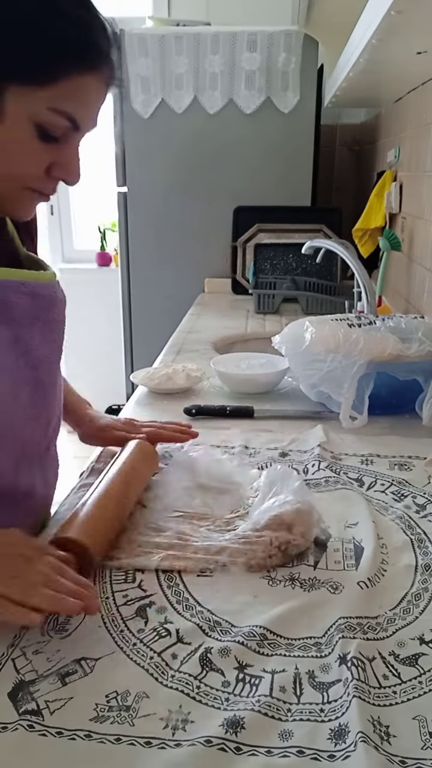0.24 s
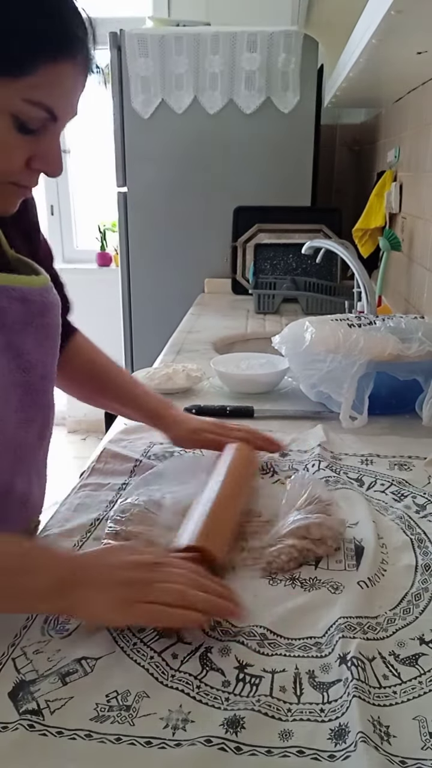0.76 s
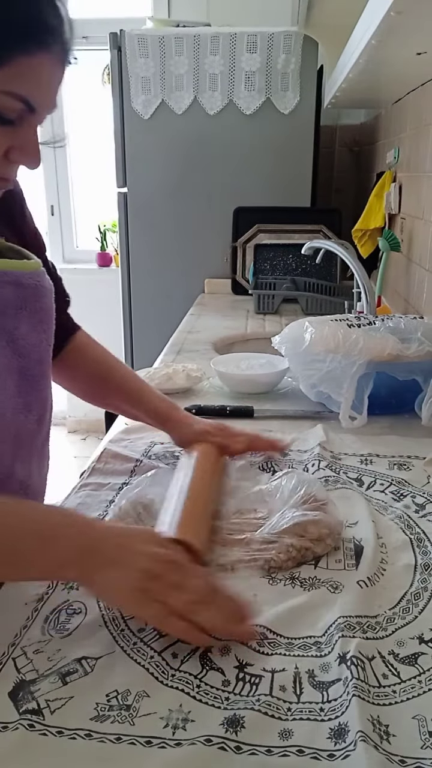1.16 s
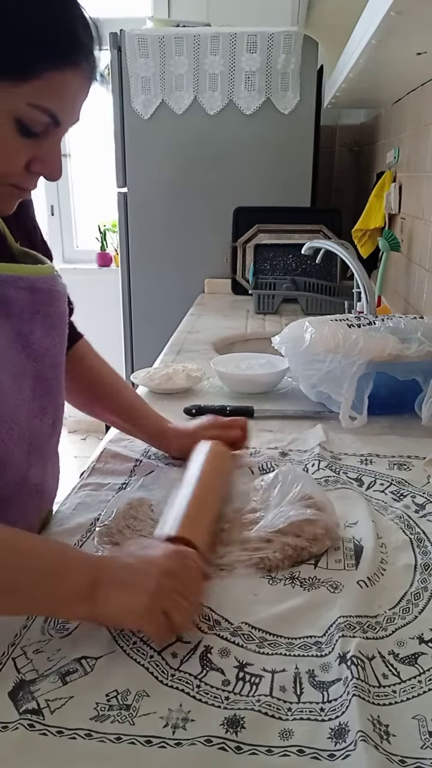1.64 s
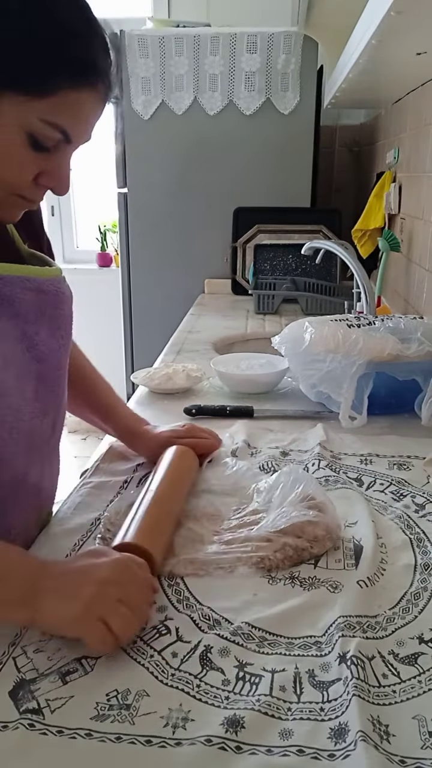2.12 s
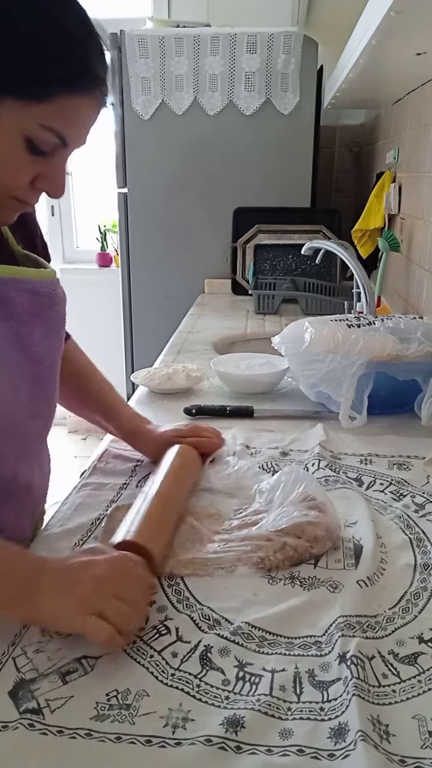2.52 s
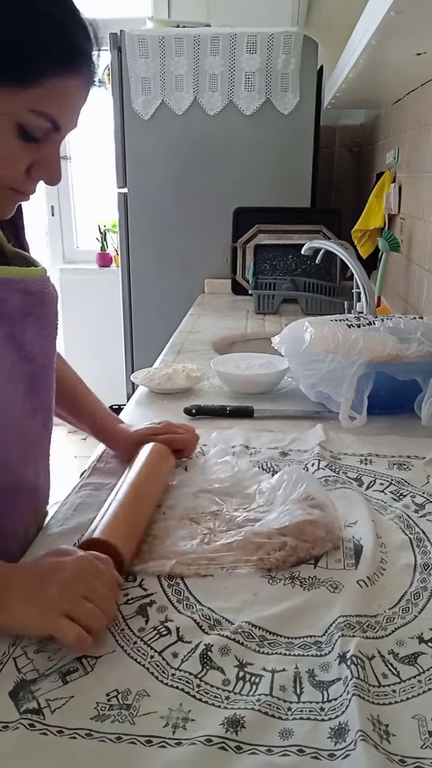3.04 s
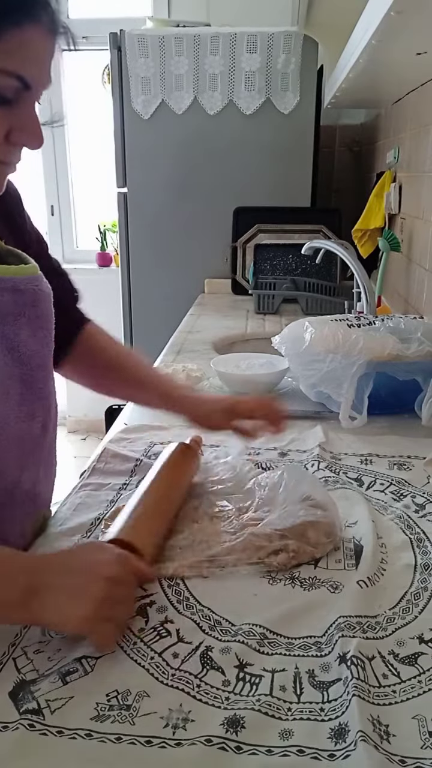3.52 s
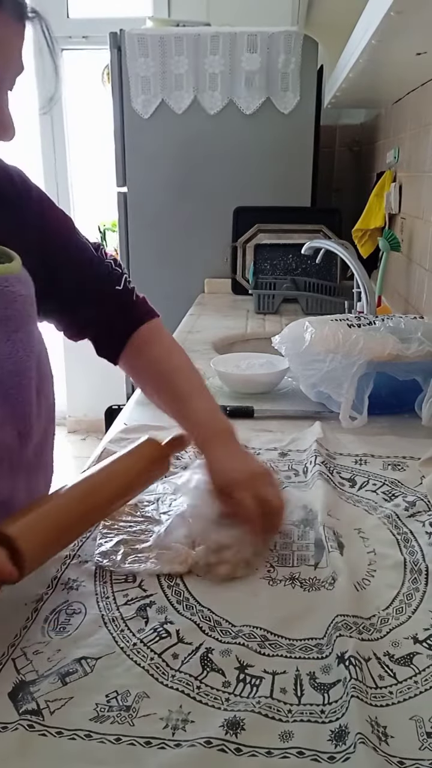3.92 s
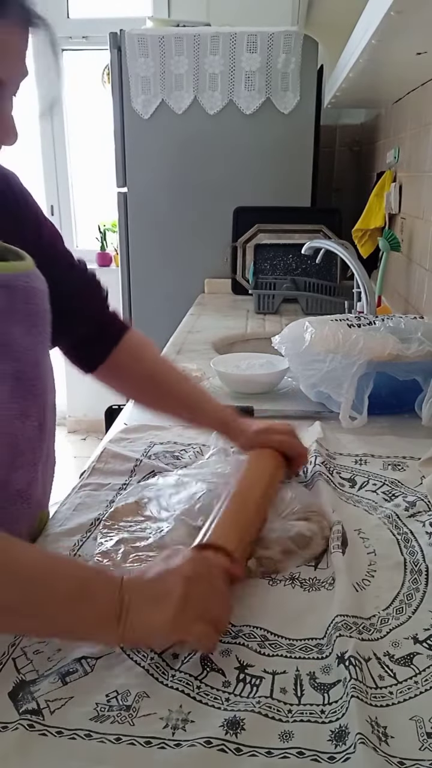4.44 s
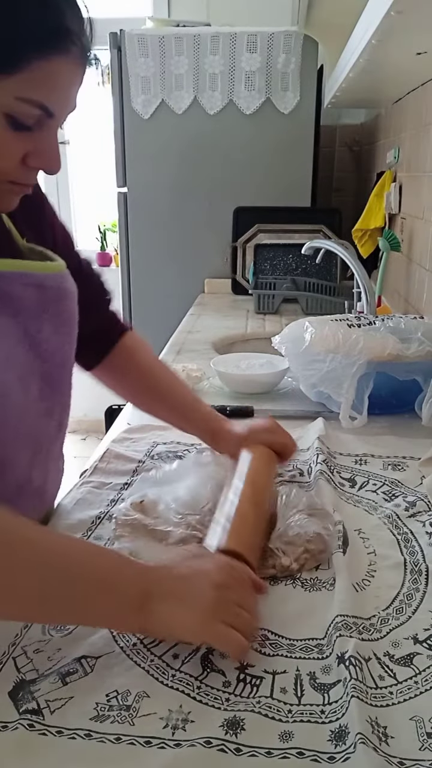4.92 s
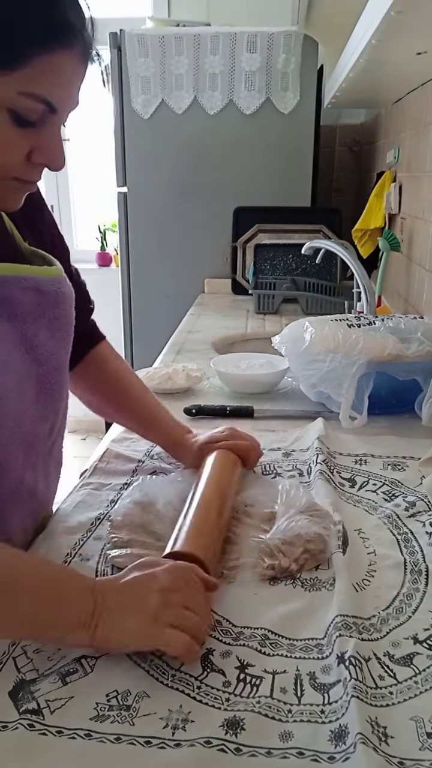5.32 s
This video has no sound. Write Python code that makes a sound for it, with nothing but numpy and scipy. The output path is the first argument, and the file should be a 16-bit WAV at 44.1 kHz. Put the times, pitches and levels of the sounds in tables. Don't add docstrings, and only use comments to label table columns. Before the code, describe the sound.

A wooden rolling pin crunches nuts in a crinkling plastic bag on a kitchen counter, with sharp cracks and dull thumps.

```python
import sys
import numpy as np
from scipy import signal
from scipy.fft import rfft, irfft
from scipy.io import wavfile

SR = 44100
rng = np.random.default_rng(int(sys.argv[2]) if len(sys.argv) > 2 else 0)


def file_out(sig):
    cols = np.atleast_2d(sig).T
    lim = np.clip(cols, -1, 1)
    pcm = np.round(lim * 32767).astype(np.int16)
    wavfile.write(sys.argv[1], SR, pcm)


def gain_from_decibels(decibels):
    exponent = np.asarray(decibels, float) / 20
    return 10 ** exponent


N = 245195
TIME = np.arange(N) / SR


def rms_one(x):
    return x / np.sqrt(np.mean(x ** 2) + 1e-20)


def peak_one(x):
    return x / np.abs(x).max()


def at_hz(points, hz):
    table = np.array(points)
    return np.interp(np.log(hz), np.log(table[:, 0]), table[:, 1])


def convolve(x, response):
    return signal.fftconvolve(x, response)[:len(x)]


def colour(points, size=4096):
    hz = np.maximum(np.fft.rfftfreq(size, 1 / SR), 10)
    level_db = np.maximum(at_hz(points, hz), -70)
    cepstrum = irfft(np.log(gain_from_decibels(level_db)))
    cepstrum[1:size // 2] *= 2
    cepstrum[size // 2 + 1:] = 0
    response = irfft(np.exp(rfft(cepstrum)))
    return response / np.sqrt(np.sum(response ** 2))


def band(x, low_hz, high_hz, order=2):
    edges = [low_hz, min(high_hz, .45 * SR)]
    return signal.sosfilt(signal.butter(order, edges, "band", fs=SR, output="sos"), x)


def drift(rate):
    step = 40
    r = np.exp(-2 * np.pi * rate * step / SR)
    chance = rng.standard_normal(N // step + 2002)
    slow = signal.lfilter([1], [1, -2 * r, r * r], chance)[2000:]
    return np.interp(np.arange(N) / step, np.arange(len(slow)), rms_one(slow))


def ring(x, hz, t60):
    r = gain_from_decibels(-60 / (t60 * SR))
    w = 2 * np.pi * hz / SR
    return signal.lfilter([0, np.sin(w)], [1, -2 * r * np.cos(w), r * r], x + 1e-18)


def grains(per_s, spread_db):
    sizes = gain_from_decibels(spread_db * np.minimum(rng.exponential(1, N), 5)) * rng.choice([-1, 1], N)
    return rms_one(sizes * (rng.random(N) < per_s / SR))


def add(track, s, sound):
    i = round(s * SR)
    track[i:i + len(sound)] += sound[:N - i]


def pressure(rows, film_db, body_db):
    s, db, rise, fall, weight_db = np.transpose(rows)[:, :, None]
    t = TIME[::50]
    away = np.maximum((s - t) / np.maximum(rise, .01), (t - s) / np.maximum(fall, .01))
    off_db = -20 * away ** 1.566
    load_db = db + 1.62 * off_db
    crumb_db = np.max(db + off_db, axis=0)
    pin_db = np.max(load_db + 0.58 * weight_db, axis=0) + body_db
    rumble_db = np.max(load_db + weight_db, axis=0)
    levels = [crumb_db + film_db, crumb_db, pin_db, rumble_db]
    return [np.interp(TIME, t, np.maximum(level, -120)) for level in levels]


# t/s of most pressure, crunch level/dB, rise/s, fall/s, weight on the counter/dB
STROKES = [(0.0, -55.5, 0.11, 0.25, -15), (0.114, -49, .1, 0.15, 1), (0.36, -49.5, .08, 0.31, 4.5),
           (0.444, -37.5, 0.032, 0.042, -6), (0.47, -49, .1, .17, -4), (0.70, -57.5, 0.36, 0.39, -13),
           (0.86, -52, .2, 0.1, -10.5), (0.98, -55, 0.13, 0.18, -8), (1.206, -52.5, .08, 0.12, 2),
           (1.39, -55.5, 0.068, .12, 4), (1.47, -54, 0.19, 0.2, -7), (1.70, -67.5, 0.22, 0.22, -2),
           (2.05, -56, 0.18, 0.099, 6), (2.21, -55, .08, 0.12, 0), (2.39, -55.5, 0.12, 0.19, 0.5),
           (2.594, -57, 0.12, 0.1, -1.5), (2.80, -52.5, .16, 0.13, 5), (2.97, -56.5, 0.11, 0.16, 0),
           (3.16, -54.5, 0.092, 0.17, -2), (3.384, -60, 0.18, 0.16, -8.5), (4.42, -42.5, 0.032, 0.048, -2),
           (4.46, -51.5, 0.068, 0.2, 1), (4.89, -55, .03, .13, -12), (5.07, -60, .09, .1, -6)]
# same columns
# t/s, crunch level/dB, rise/s, fall/s, weight/dB
GATHERS = [
    (3.68, -51, 0.028, 0.087, -3.5),
    (3.73, -49, 0.08, .24, -18.5),
    (3.942, -51, 0.18, 0.11, -23),
    (4.03, -55.5, .12, 0.083, -20),
    (4.12, -73.5, .1, 0.13, -13),
    (4.62, -61.5, .1, 0.07, -12),
    (4.70, -46, 0.045, 0.12, -12.5),
    (4.75, -47, 0.098, 0.099, -14),
]
# t/s, crunch level/dB, rise/s, fall/s, weight/dB
SETTLES = [
    (3.54, -67, .1, .12, -14),
    (4.3, -63, 0.055, 0.042, -10),
    (5.006, -48, 0.023, .07, -20),
    (5.07, -57, 0.088, 0.14, 9.5),
    (5.22, -54.5, 0.16, .05, -12),
    (5.31, -41, 0.033, 0.11, 2),
    (5.42, -54, .1, .07, 4.5),
    (5.52, -39.5, 0.016, 0.063, 1),
]


def pushes():
    return np.max([pressure(STROKES, film_db=-1.5, body_db=-9),
                   pressure(GATHERS, film_db=-0.95, body_db=3),
                   pressure(SETTLES, film_db=-14, body_db=-10.5)], axis=0)


# f/Hz, level per Hz/dB
CRUNCH_TONE = [(410, -61.5), (700, -12), (798, -6), (874, -11.5), (1740, -3.5), (1910, -3.5), (2450, 1.5),
               (2790, -3), (4700, -10.5), (6020, -2), (8900, -12.5), (10500, -25.5), (13900, -35),
               (15100, -17), (15800, -17)]


def crunch(film_db, crumb_db):
    clumps_per_s = 7000 * gain_from_decibels(2.5 * drift(25))
    snaps = convolve(grains(clumps_per_s, spread_db=2.0), colour(CRUNCH_TONE))
    film = signal.sosfilt(signal.butter(4, 4300, "high", fs=SR, output="sos"), snaps)
    crumbs = signal.sosfilt(signal.butter(4, 4300, "low", fs=SR, output="sos"), snaps)
    film = gain_from_decibels(film_db - 2.0 + drift(14)) * rms_one(film)
    return film + gain_from_decibels(crumb_db - 0.5 + drift(13.5)) * rms_one(crumbs)


# f/Hz, width/Hz, level/dB
PIN = [(280, 278, 1), (434, 406, 2.5), (627, 197, 0.5), (860, 110, -12.5)]


def wood(x):
    out = 0
    for k, (hz, width, db) in enumerate(PIN):
        sign = (-1) ** k
        out = out + sign * gain_from_decibels(db) * width * ring(x, hz, 2.03 / width)
    return out / SR * 6


# f/Hz, level/dB, time to fall 60 dB/s
COUNTER = [(87.7, -2, 0.15), (109.7, -1, 0.26), (145, 2, 0.17), (240.5, -5.5, 0.16), (295, -8, 0.2)]


def rolling(body_db, rumble_db):
    bumps = grains(120, spread_db=2.5) + 0.1 * rng.standard_normal(N)
    push = bumps * gain_from_decibels(rumble_db)
    rumble = sum(gain_from_decibels(db) * ring(push, hz, 0.5 * t60) for hz, db, t60 in COUNTER)
    body = rms_one(wood(grains(1500, spread_db=3.5)))
    rest = gain_from_decibels(-81)
    return gain_from_decibels(-29) * rumble + (gain_from_decibels(body_db - 7.5) + rest) * body


# t/s, peak level/dB, pin body level/dB, fullness/dB, brightness/dB
CRACKS = [(0.107, -33.5, -52, -12.5, -21), (0.4353, -38, -43, -6, -12), (0.4467, -31, -44, -10.5, -12),
          (0.46, -42, -46, -23, -22), (0.9504, -20.5, -34, -17.5, -14.5), (1.1986, -35, -51.5, -14, -17),
          (1.9104, -11.5, -47, -26, -15.5), (2.787, -41.5, -60, -20, -13), (2.795, -42, -53, -17, -15),
          (3.13, -49, -50, -26, -13), (3.678, -50.5, -54, -5, -2), (4.4114, -30, -54, -30, -20),
          (4.419, -24.5, -53.5, -17, -35), (5.011, -20.5, -44, -13, -21), (5.2764, -14, -25, -12.5, -15),
          (5.402, -31, -61, -25, -22), (5.5214, -17, -45, -15.5, -21.5)]
# t/s, peak level/dB, fullness/dB, brightness/dB
SNAPS = [(1.6128, -42, -13, -21), (1.63, -46.5, -26, -11.5), (1.806, -43.5, -21, -43),
         (3.4453, -38, -24, -25), (3.5001, -39, -24, -20), (3.517, -34, -26, -24), (3.537, -35.5, -32, -27),
         (4.253, -41, -22.5, -18), (4.2724, -35, -27, -17.5), (4.8642, -21, -21.5, -15.5),
         (5.152, -27, -19.5, -15), (5.219, -44, -26, -29)]


def cracks():
    out, shell = np.zeros(N), colour(CRUNCH_TONE)
    lead, length = .02, .007
    t = np.arange(4096) / SR - lead
    after = np.maximum(t, 0)
    shape = (1 - np.exp(-after / (0.23 * length))) * np.exp(-(after / length) ** 2)
    creak = gain_from_decibels(-28) * np.exp(-np.abs(t) / 0.0053)
    knock = peak_one(wood(np.exp(-((t - .004) / 0.00022) ** 2)))
    breaks = list(CRACKS) + [(s, db, db - 42, *tone) for s, db, *tone in SNAPS]
    chance = rng.standard_normal((len(breaks), len(t)))
    for (s, peak_db, body_db, low_db, bright_db), split in zip(breaks, chance):
        burst = convolve(split * (shape + creak), shell)
        low = peak_one(band(burst, 1120, 1750, order=4))
        middle = peak_one(band(burst, 1800, 4900, order=4))
        top = peak_one(band(burst, 5300, 8200) + gain_from_decibels(-9) * band(burst, 9000, 16000))
        start = s - lead - .002
        sound = gain_from_decibels(low_db + 8) * low + middle + gain_from_decibels(bright_db + 8) * top
        add(out, start, gain_from_decibels(peak_db - 1.0) * sound)
        add(out, start, gain_from_decibels(body_db + 7) * knock)
    return out


# t/s, f/Hz, peak level/dB, time to fall 60 dB/s
RINGS = [(0.444, 1680, -31, 0.033), (0.952, 2730, -26, 0.042), (.956, 456, -31, 0.084),
         (1.913, 1496, -37, 0.25), (1.911, 2170, -19.5, 0.062), (1.913, 2940, -28, 0.14),
         (3.447, 2720, -41.5, .07), (1.912, 2750, -20, 0.055), (1.911, 3860, -18.5, 0.028),
         (3.446, 2400, -37.5, .04), (3.504, 1865, -42.5, 0.24), (3.503, 2163, -34, 0.045),
         (3.505, 2500, -45, 0.15), (4.273, 3830, -41, 0.03), (4.272, 2740, -39, 0.033),
         (4.422, 2810, -22, 0.023), (4.864, 1200, -46, 0.36), (4.863, 2847, -29, 0.055),
         (5.012, 1240, -29.5, 0.14), (5.012, 2173, -25, 0.13), (5.011, 1885, -34.5, 0.13),
         (4.254, 1397, -50, 0.05), (5.276, 475, -22.5, 0.058), (5.278, 625, -28, 0.087),
         (5.279, 1659, -30, 0.19), (5.278, 1703, -30, 0.3), (5.279, 6370, -21.5, 0.022),
         (5.522, 1237, -36, 0.34), (5.523, 2122, -27, 0.13), (5.523, 4150, -17.5, 0.024)]


def rings():
    out, t = np.zeros(N), np.arange(SR // 4) / SR
    waver, wobble = drift(45), drift(30)
    starts = rng.integers(0, N - len(t), len(RINGS))
    for (s, hz, db, t60), i in zip(RINGS, starts):
        level = gain_from_decibels(db - 1.5 - 60 * t / t60 + 3.3 * waver[i:i + len(t)])
        swell = 1 - np.exp(-t / 0.00062)
        tone = np.sin(2 * np.pi * hz * t + 0.82 * wobble[i:i + len(t)])
        add(out, s - .001, level * swell * tone)
    return out


# t/s, peak level/dB, main f/Hz, upper modes level/dB
THUMPS = [(0.033, -45, 95, -17), (0.076, -41, 89.7, -13.5), (0.149, -49, 145, -15), (0.351, -40.5, 82, -11),
          (0.418, -37, 120, -13), (0.688, -54, 87, -33), (0.954, -38.5, 116, -7), (1.194, -69, 83.4, -11),
          (1.373, -52, 105, -8.5), (1.909, -28, 101, -37), (2.571, -51, 87, -14), (2.746, -46, 99, -16),
          (2.801, -53, 144, -13), (2.952, -50, 109, -25), (3.13, -46.5, 93, -6.5), (3.368, -65, 93, -34),
          (3.679, -47.5, 150, 0.5), (4.423, -48.5, 161, -25), (4.523, -56, 99.6, -16),
          (4.689, -49, 83.4, -8), (5.005, -30.5, 103, -32), (5.272, -25.5, 103, -23),
          (5.518, -28, 146, -17.5)]


def thumps():
    out, t = np.zeros(N), np.arange(SR // 2) / SR
    soft_start = 1 - np.exp(-t / 0.0054)
    chance = rng.standard_normal((len(THUMPS), len(COUNTER)))
    for (s, peak_db, main_hz, upper_db), luck in zip(THUMPS, chance):
        sound = 0
        for (hz, db, t60), spread in zip(COUNTER, luck):
            near_db = -12 * abs(np.log2(hz / main_hz)) if hz < 200 else upper_db + 6.5
            level = gain_from_decibels(db + near_db + 2 * spread - 60 * t / t60)
            sound = sound + level * np.sin(2 * np.pi * hz * t)
        add(out, s - .002, gain_from_decibels(peak_db + 2.5) * sound * soft_start)
    return out


# t/s, peak level/dB, f/Hz, length/s
SQUEAKS = [(0.384, -44.5, 5240, .012), (1.518, -53, 1833, 0.011), (1.559, -59, 1850, 0.035),
           (1.778, -72, 4210, .03), (2.372, -57, 5300, 0.0031), (2.421, -45, 5110, 0.0044),
           (2.597, -45, 3690, 0.0045), (2.623, -52, 3690, 0.0046), (2.65, -55, 3680, 0.0055),
           (2.756, -59, 3670, 0.0071), (3.106, -33.5, 5075, 0.0048), (3.129, -48.5, 5100, .015)]


def squeaks():
    out, t = np.zeros(N), np.arange(-SR // 10, SR // 10) / SR
    for s, db, hz, length in SQUEAKS:
        turn = 2 * np.pi * hz * t
        whistle = np.sin(turn) + gain_from_decibels(-30) * np.sin(2 * turn)
        add(out, s + t[0], gain_from_decibels(db) * np.exp(-(t / length) ** 2) * whistle)
    return out


# f/Hz, time to fall 60 dB/s
KITCHEN = [(100, 0.71), (400, 0.31), (1100, 0.45), (2900, 0.31), (7700, 0.3), (15000, 0.36)]


def kitchen():
    t, edges = np.arange(SR // 2) / SR, 60 * 2 ** np.arange(0, 8.6, .5)
    white = rng.standard_normal((2, len(t)))
    echoes = 0
    for k, (low, high) in enumerate(zip(edges, edges[1:])):
        t60 = at_hz(KITCHEN, np.sqrt(low * high))
        echoes = echoes + band(white[k % 2], low, high) * gain_from_decibels(-60 * t / t60)
    echoes = echoes * (1 - np.exp(-(t / .006) ** 2))
    return echoes / np.sqrt(np.sum(echoes ** 2))


# f/Hz, level per Hz/dB
HUSH_TONE = [(18, -52), (30, -50), (95, -18), (174, -41.5), (345, -25.5), (384, -14), (486, -39),
             (632, -7.5), (889, -20), (2980, -10), (16000, -35.5)]
# f/Hz, level/dB
HUM = [(100, -81.5), (390, -81)]


def hush():
    hum = sum(gain_from_decibels(db + 0.73 * drift(4)) * np.sin(2 * np.pi * hz * TIME) for hz, db in HUM)
    return gain_from_decibels(-78) * convolve(rng.standard_normal(N), colour(HUSH_TONE)) + hum


def scene():
    film_db, crumb_db, body_db, rumble_db = pushes()
    strokes = crunch(film_db, crumb_db) + rolling(body_db, rumble_db)
    sharp = cracks()
    slips = rings() + squeaks()
    into_room = gain_from_decibels(-11.5) * strokes + gain_from_decibels(-2.0) * sharp + gain_from_decibels(-4) * slips
    echoes = convolve(into_room, kitchen())
    return (strokes + sharp + slips + thumps() + echoes + hush())[None]


def roll_off(x):
    return signal.sosfilt(signal.butter(12, 16440, fs=SR, output="sos"), x)


def record(dry):
    x = signal.sosfilt(signal.butter(7, 64, "high", fs=SR, output="sos"), dry)
    x = .55 * np.tanh(x / .55)
    x = signal.sosfilt(signal.cheby2(24, 50, 15700, fs=SR, output="sos"), x)
    return roll_off(x)


dry = scene()
out = record(dry)
file_out(out)
```